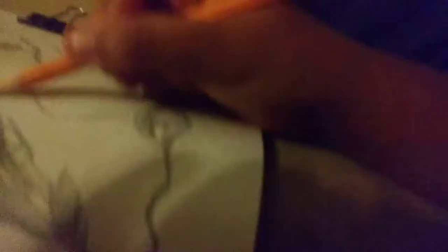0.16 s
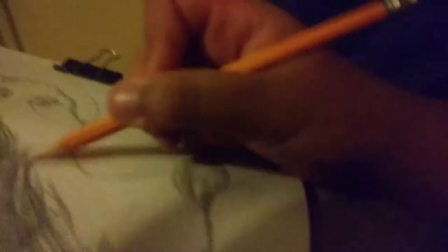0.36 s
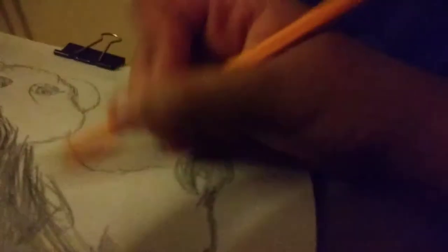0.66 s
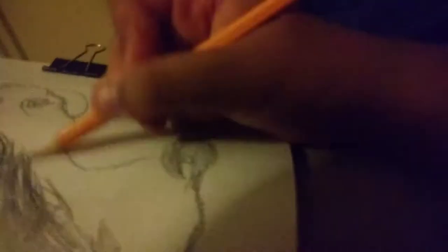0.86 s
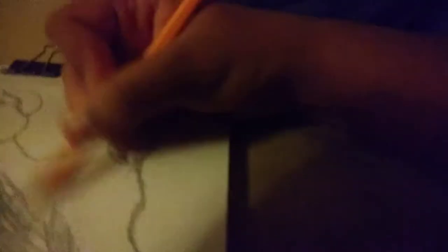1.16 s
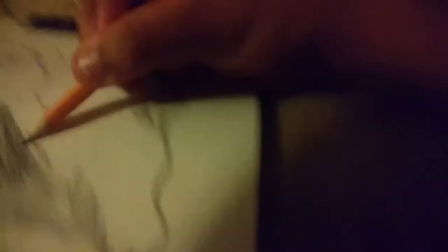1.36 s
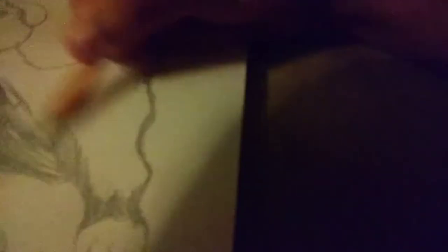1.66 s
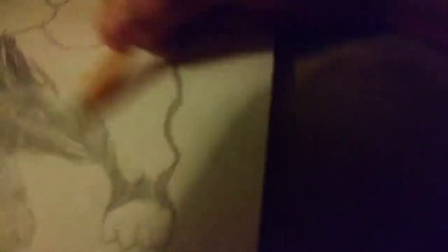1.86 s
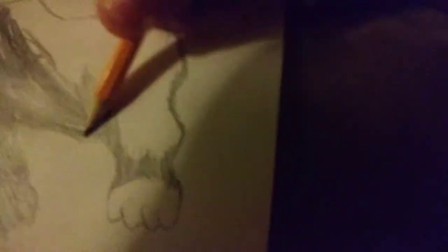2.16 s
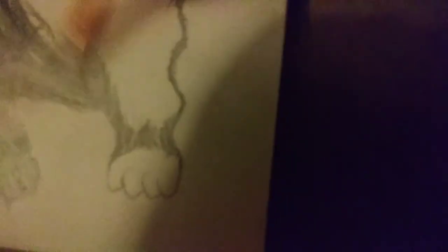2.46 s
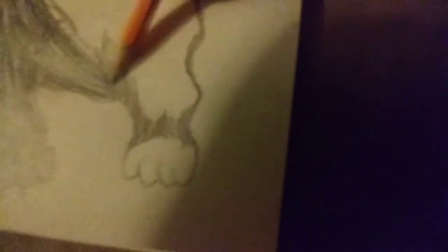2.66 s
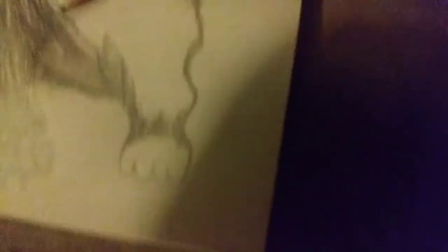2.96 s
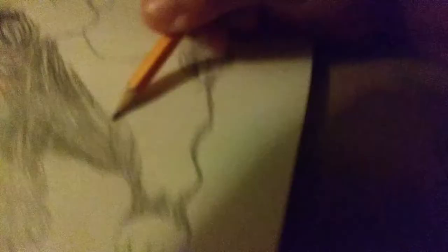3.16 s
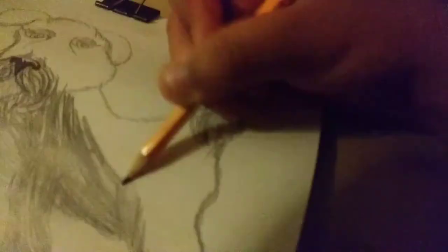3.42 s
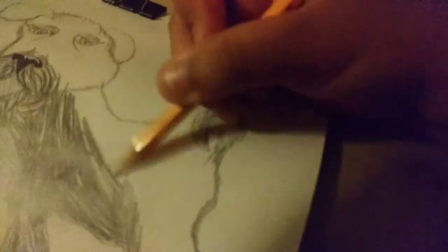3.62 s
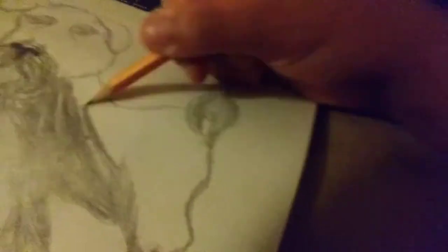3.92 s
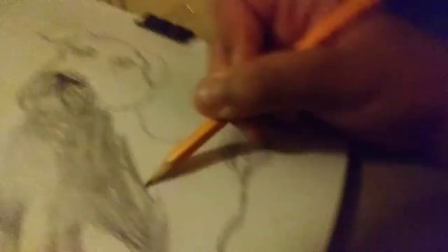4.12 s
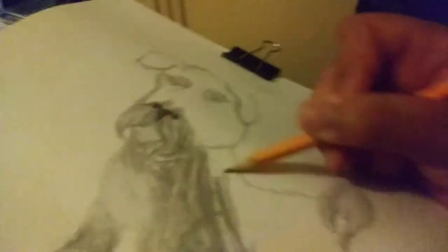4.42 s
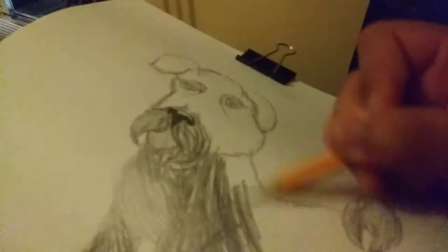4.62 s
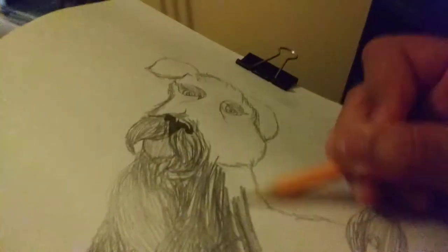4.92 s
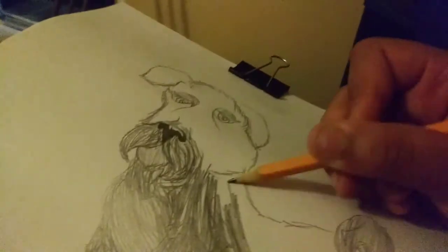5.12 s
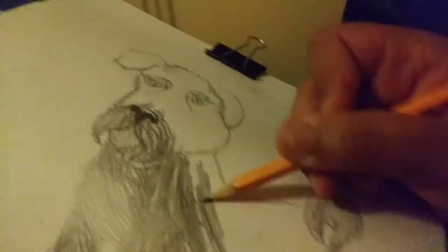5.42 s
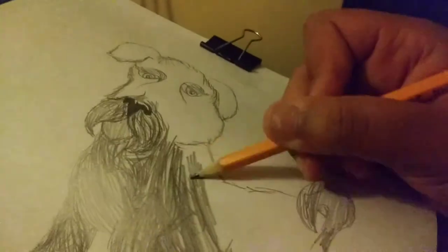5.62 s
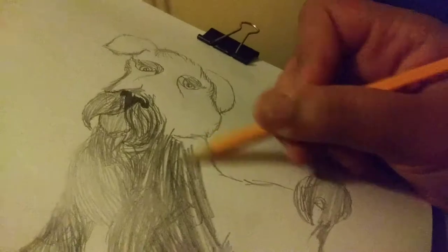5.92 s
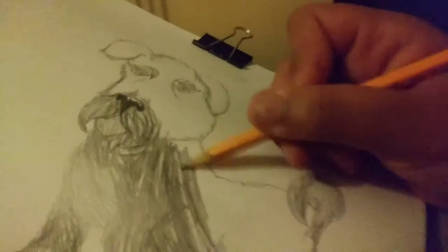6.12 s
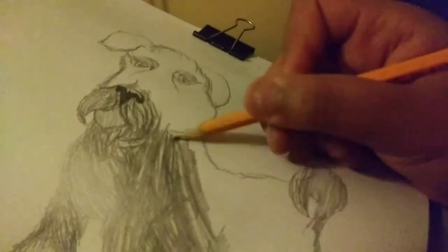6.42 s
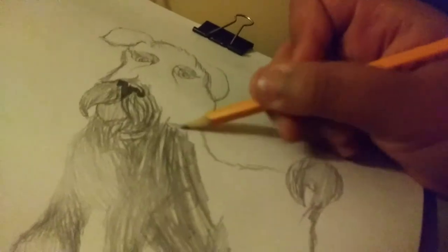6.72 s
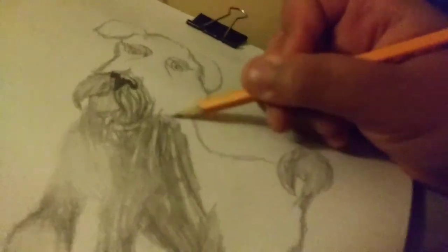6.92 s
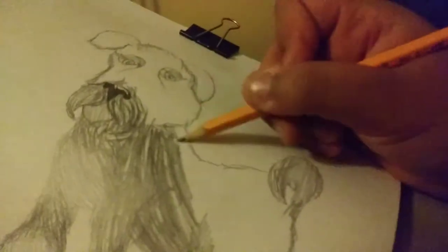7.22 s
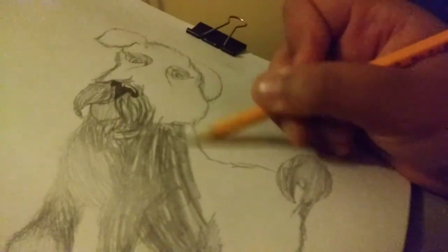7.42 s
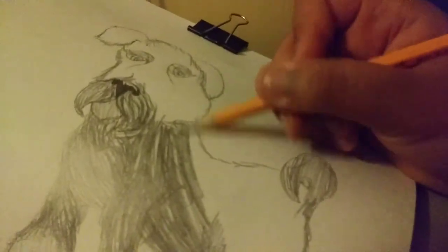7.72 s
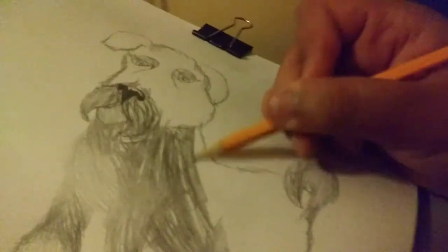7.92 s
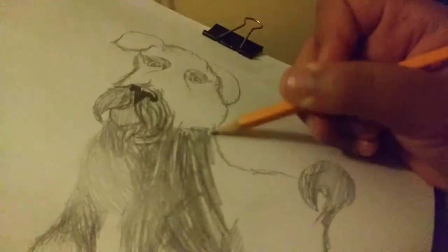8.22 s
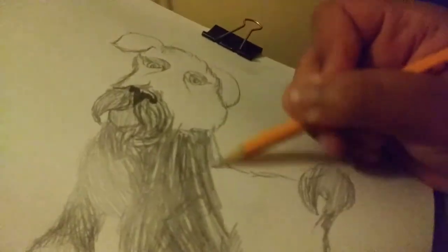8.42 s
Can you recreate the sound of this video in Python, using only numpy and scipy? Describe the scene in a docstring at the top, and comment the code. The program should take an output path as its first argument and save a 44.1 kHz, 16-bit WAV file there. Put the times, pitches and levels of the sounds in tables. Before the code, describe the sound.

A graphite pencil scratches quickly back and forth on paper, close by in a quiet room.

```python
"""A quiet room: a graphite pencil shades quickly back and forth on a paper pad, close to a small
hand-held camera. The paper's tooth rattles the lead and the pad's resonances; short low swells sound
under the strokes and the pad is bumped a few times. The echo off the pad cuts dips in the scratch that
slide as the camera moves. Behind it are room noise and mains hum. The camera's noise suppressor pulls
down every band that sinks to the level of the room noise."""
import sys
import numpy as np
from scipy import signal
from scipy.fft import rfft, irfft, next_fast_len
from scipy.io import wavfile
from scipy.ndimage import uniform_filter1d, map_coordinates

SR = 44100
rng = np.random.default_rng(int(sys.argv[2]) if len(sys.argv) > 2 else 0)


def waveform_to_disk(signal):
    """Save audio, clipped to [-1, 1], as 16-bit WAV at the path in sys.argv[1]."""
    frames = np.transpose(np.atleast_2d(signal))
    scaled = np.clip(frames, -1, 1) * 32767
    samples = np.round(scaled).astype(np.int16)
    wavfile.write(sys.argv[1], SR, samples)


N = 377937

# room noise spectrum: freq_hz, density_db
ROOM_NOISE = [(20, -63), (60, -73), (165, -86), (240, -77), (400, -87), (600, -91), (1000, -88),
              (1850, -87), (3500, -86.5), (7400, -95), (9000, -104), (15400, -108)]


def amp(db):
    """Decibels to gain."""
    return 10 ** (np.asarray(db) / 20)


def unit(x):
    """Scaled to rms 1."""
    return x / np.sqrt(np.mean(x ** 2) + 1e-20)


def step(x):
    """Smooth rise from 0 to 1."""
    return np.sin(np.pi / 2 * np.clip(x, 0, 1)) ** 2


def spectrum_db(points, hz):
    """Levels interpolated on a log frequency axis."""
    freq_hz, level_db = np.transpose(points)
    return np.interp(np.log(hz + 1), np.log(freq_hz + 1), level_db)


def wobble(rate_hz):
    """Smooth random curve, rate_hz knots a second."""
    knots = rng.standard_normal(int(N * rate_hz / SR) + 4)
    return map_coordinates(knots, [np.arange(N) * rate_hz / SR])


def filtered(x, response):
    """x through the gain curve response(hz)."""
    size = next_fast_len(N + 8192)
    return irfft(rfft(x, size) * response(np.fft.rfftfreq(size, 1 / SR)), size)[..., :N]


def room():
    """Steady noise and a slightly unsteady mains hum."""
    # mains harmonics: freq_hz, rms_db
    mains = [(59.6, -57.5), (119.5, -64), (240, -63)]
    t = np.arange(N) / SR
    noise = filtered(rng.standard_normal(N),
                     lambda hz: amp(spectrum_db(ROOM_NOISE, hz)) * np.sqrt(SR / 2))
    hum = sum(amp(db + 2.5 * wobble(9)) * np.sin(2 * np.pi * hz * t + 0.82 * wobble(8))
              for hz, db in mains)
    return noise + np.sqrt(2) * hum


def low_swells():
    """Narrow noise bands that rise and fade; louder ones last longer."""
    # clearest swells: centre_s, pitch_hz, top_db
    clear = [(.026, 624, -55), (.287, 741, -48.5), (.313, 441, -53), (.531, 711, -55), (.748, 718, -53),
             (.755, 462, -54), (.987, 472, -56.5), (1.477, 969, -57.5), (1.493, 420, -53.5),
             (1.814, 484, -57.5), (1.936, 436, -55), (2.064, 926, -56), (2.328, 464, -58.5),
             (2.45, 462, -60), (2.537, 508, -61), (2.683, 446, -56), (3.268, 764, -53.5), (3.518, 885, -54),
             (3.54, 538, -55), (3.573, 301, -65.5), (4.94, 417, -58), (4.985, 614, -55.5),
             (5.776, 789, -60), (6.22, 894, -57), (6.432, 689, -61), (6.73, 1040, -58.5), (6.734, 711, -59),
             (6.89, 444, -58.5), (6.951, 915, -59), (7.155, 861, -60.5), (7.364, 860, -59),
             (7.448, 431, -57.5), (8.023, 408, -56), (8.163, 523, -47), (8.474, 327, -53.5)]
    faint = [(when * N / SR, 420 + 550 * pitch, -64 + 4 * level)
             for when, pitch, level in rng.random((8, 3))]
    out = np.zeros(N + SR)
    for centre_s, pitch_hz, top_db in clear + faint:
        half_s = 0.059 + 0.002 * (top_db + 60)
        t = np.arange(round(2 * half_s * SR)) / SR
        tones_hz = pitch_hz + 50 * rng.standard_normal((12, 1))
        band = unit(np.sin(2 * np.pi * (tones_hz * t + rng.random((12, 1)))).sum(0))
        start = max(round((centre_s - half_s) * SR), 0)
        out[start:][:len(t)] += amp(top_db) * band * np.sin(np.pi * t / t[-1]) ** 2
    return out[:N]


def pad_knocks():
    """Dull bumps on the pad: heavily damped sines."""
    # bumps: start_s, level_db, pitch_hz
    bumps = [(2.335, -30, 70), (2.937, -23, 457), (2.958, -20, 268), (2.984, -34, 220), (3.19, -34, 201)]
    t60_cycles = 3.8
    out, t = np.zeros(N), np.arange(SR // 10) / SR
    for start_s, level_db, pitch_hz in bumps:
        decay = amp(level_db - 60 * t * pitch_hz / t60_cycles)
        out[round(start_s * SR):][:len(t)] += decay * np.sin(2 * np.pi * pitch_hz * t)
    return out


def room_tail(envelope, t60_s):
    """Envelope of the room's tail: power dies away after each stroke."""
    pole = 10 ** (-6 / (t60_s * SR))
    return np.sqrt(np.abs(signal.lfilter([1 - pole], [1, -pole], envelope ** 2)))


def pad_echo(tip):
    """The pad's echo cancels the tip in dips that follow the camera; one band drifts in level."""
    # cancellation dips: centre_hz, width_hz, depth_ratio
    notches = [(1094, 212, 0.78), (1828, 184, 0.93), (3533, 222, 0.61), (7396, 245, 0.79),
               (8730, 750, 0.54), (10180, 410, 0.5), (12330, 680, 0.56), (2476, 170, 0.28),
               (5840, 280, 0.17)]
    # echo as the camera moves: time_s, strength_ratio, freq_ratio
    echo_path = [(0, 0.5, 1.02), (1, 0.24, 0.94), (1.6, 0.62, 0.99), (2, 0.77, 1.09), (2.45, 1, 1.055),
                 (2.55, 0.09, 1.01), (3.5, 0.6, 0.987), (4.5, 0.83, 1.03), (5.1, 0.97, 1.02),
                 (5.4, 0.8, 0.994), (6, 1, 0.99), (7, 1, 1.024), (7.8, 0.81, 1.025), (8.57, 0.76, 1.02)]
    # drifting band: time_s, gain_db
    band_drift = [(0, 2.5), (1.4, 0), (2, -9), (2.45, -6), (2.55, -0.9), (5.3, 1.7), (6.1, 4), (7.3, 4),
                  (7.9, 3.5), (8.57, 2.5)]
    band_hz, band_width_hz = 2466, 210
    hz, t, spectra = signal.stft(tip, SR, nperseg=1024)
    time_s, strength, freq_ratio = np.transpose(echo_path)
    slid_hz = hz[:, None] / np.interp(t, time_s, freq_ratio)
    dips = sum(depth * np.exp(-((slid_hz - centre_hz) / width_hz) ** 2)
               for centre_hz, width_hz, depth in notches)
    echo_gain = 1 - np.interp(t, time_s, strength) * dips
    band_shape = np.exp(-((hz[:, None] - band_hz) / band_width_hz) ** 2)
    band_gain = amp(np.interp(t, *np.transpose(band_drift)) * band_shape)
    return signal.istft(spectra * band_gain * echo_gain, SR, nperseg=1024)[1][:N]


def paper_tooth():
    """Uneven grains rattle the lead; the colour shifts in random patches of time and frequency."""
    patch_rms_db = 2.07
    grains = rng.standard_normal(N) * amp(0.84 * wobble(900) + 0.86 * wobble(150))
    spectra = signal.stft(grains, nperseg=512)[2]
    patches = uniform_filter1d(rng.standard_normal(spectra.shape), size=4, axis=0)
    patches = uniform_filter1d(patches, size=20, axis=1)
    return signal.istft(spectra * amp(patch_rms_db * unit(patches)), nperseg=512)[1][:N]


def hand_motion(t):
    """Each stroke speeds up fast and slows more gently; the tip drags on through the turn."""
    # strokes, forward and back in turn: start_s, length_s, mid_db, swell_db, turn_re_mid_db
    strokes = [(0.0, 0.076, -29, -14.5, -16), (0.1, .11, -31, 5, -43), (.248, 0.072, -25, -3, -21),
               (.348, 0.1, -32.5, 6, -7.5), (.484, .073, -28.5, 4, -8), (0.594, .088, -33.5, -0.5, -7),
               (0.705, .071, -24.5, -2.5, -12.5), (0.809, 0.098, -33.5, 5, -11),
               (.937, 0.076, -24, -6, -13.5), (1.041, .1, -34.5, -1, -19), (1.178, 0.079, -27, -4.5, -15),
               (1.29, 0.099, -35, 0.5, -38), (1.42, 0.096, -32, -10, -16), (1.538, 0.084, -35.5, -5.5, -19),
               (1.665, 0.079, -33, 1, -19), (1.774, .082, -34, -4, -16), (1.897, .088, -33, -2.5, -11.5),
               (2.008, 0.097, -35.5, -2.5, -18), (2.146, 0.093, -36, -8.5, -17),
               (2.272, 0.061, -35, -0.5, -14.5), (2.386, 0.092, -41, -8, -16),
               (2.505, 0.087, -33, -2.5, -17.5), (2.63, 0.075, -35, -1, -10),
               (2.736, 0.099, -36, -1.5, -14), (2.865, 0.088, -33.5, -5.5, -6),
               (2.982, 0.1, -31.5, -2, -15), (3.123, 0.082, -30.5, 0, -11.5),
               (3.246, 0.091, -29.5, -6.5, -22), (3.365, 0.087, -28.5, -6, -30),
               (3.472, 0.098, -31.5, -2, -8.5), (3.596, 0.077, -29.5, -0.5, -12),
               (3.699, 0.082, -33.5, -4, -5), (3.809, 0.08, -31, -1, -16), (3.916, .1, -33, 3, -16),
               (4.047, 0.085, -30.5, -4.5, -16), (4.156, 0.098, -30, 2.5, -23),
               (4.288, 0.079, -30.5, -2.5, -16), (4.396, 0.098, -32.5, 0.5, -27),
               (4.523, 0.076, -33, -5.5, -14), (4.625, 0.093, -36, -2, -12),
               (4.755, 0.077, -37.5, -10, -13), (4.85, 0.082, -36.5, 11, -19), (4.966, 0.06, -34, -4, -15),
               (5.054, 0.088, -36, 10.5, -16), (5.183, 0.076, -32.5, -12, -19),
               (5.287, 0.094, -36, -2, -9.5), (5.42, 0.065, -32.5, 4, -7.5),
               (5.519, 0.076, -34.5, 6.5, -10.5), (5.635, 0.061, -36, -8, -0.5),
               (5.733, 0.084, -37.5, 5, -9), (5.86, 0.059, -35.5, -3, -10), (5.973, 0.083, -41, -6, -4.5),
               (6.083, 0.073, -41, 4, -10), (6.207, 0.05, -37.5, 1, -8), (6.303, 0.092, -41.5, 9, -10),
               (6.419, .1, -42, -10, -3.5), (6.555, 0.067, -43, 14, -5.5), (6.668, 0.064, -41, 0, -7),
               (6.789, .088, -41.5, 8, -1.5), (6.913, 0.064, -38.5, -19, -3), (6.985, 0.095, -40.5, 3, 0),
               (7.117, 0.086, -41.5, -11, -2.5), (7.215, 0.084, -38, 18, -5.5),
               (7.357, 0.072, -38.5, -15, -7), (7.457, 0.07, -36, 3, -15), (7.545, 0.074, -37.5, 1, -8),
               (7.644, 0.071, -36, 4, -6), (7.753, .08, -37, 10, -6.5), (7.87, 0.072, -31, 4, -11),
               (7.988, 0.082, -35, 5, -9), (8.12, 0.074, -32, 6, -9), (8.226, 0.083, -34, 5, -13),
               (8.341, 0.085, -33, 4, -10), (8.455, 0.084, -34, 9, -11.5)]
    rise_s, fall_s, ends_db = 0.021, 0.035, -4.5
    sliding, off_centre = np.zeros(N), np.ones(N)
    for start_s, length_s, mid_db, swell_db, _ in strokes:
        span = slice(max(round((start_s - 0.03) * SR), 0), round((start_s + length_s + 0.06) * SR))
        age_s = t[span] - start_s
        speed = step(age_s / rise_s + 0.5) * step((length_s - age_s) / fall_s + 0.42)
        ends = (2 * age_s / length_s - 1) ** 2  # 0 in mid-stroke, 1 at either end
        sliding[span] += amp(mid_db + swell_db * (age_s / length_s - 0.5) + ends_db * ends) * speed
        off_centre[span] = np.where(speed > 0, np.minimum(ends, 1), off_centre[span])
    start_s, length_s, mid_db, _, turn_db = np.transpose(strokes)
    drag = amp(np.interp(t, start_s + length_s + 0.0059, mid_db + turn_db))
    backward = np.interp(t, start_s + length_s / 2, np.arange(len(strokes)) % 2)
    return sliding, drag, off_centre, backward


def pencil():
    """Lead scraping on paper, in six bands: pad, sheet, scratch, edge, hiss, air."""
    # lead on paper, shape within the bands: freq_hz, relative_db
    lead_spectrum = [(200, -9), (450, -22), (800, -20.5), (1000, -14.5), (1250, -3.5), (1550, -2),
                     (1850, -11), (2150, -11.5), (2950, -6), (3550, -8.5), (4100, -4.5), (5200, -0.9),
                     (6600, -10.5), (7500, -11.5), (8200, -16), (8900, -18.5), (10000, -21), (12500, -33),
                     (15400, -46.5)]
    # borders between the bands: freq_hz
    borders_hz = [1850, 3550, 5900, 7400, 8550]
    # balance re scratch as the camera moves: time_s, pad_db, sheet_db, edge_db, hiss_db, air_db
    balance = [(0, -8.5, -10, -1.5, -10, -14), (.7, -13, -7, -3.5, -15, -15.5),
               (1.0, -7, -6, -6, -15, -16.5), (1.4, -6.5, -3, -4.5, -11.5, -12.5),
               (2, -9, -3, -9.5, -10, -18.5), (2.43, -6, -2.5, -5, -12, -16.5),
               (2.55, -5.5, -2.5, -6, -13, -16), (2.9, -5, -1, -4, -15.5, -14),
               (3.3, -9.5, -4.5, -8, -19, -18.5), (4, -9.5, -7.5, -6.5, -19.5, -17),
               (4.7, -11, -9, -13, -18, -18), (5.1, -9, -5, -14.5, -15.5, -18),
               (5.5, -14, -6.5, -9.5, -13.5, -20.5), (6, -10, -8.5, -7, -11.5, -25.5),
               (6.8, -10.5, -9, -10, -19.5, -24.5), (7.3, -13.5, -9.5, -8, -14.5, -19.5),
               (7.9, -8, -6.5, -8, -13.5, -19.5), (8.57, -12, -8, -12, -17, -21)]
    # offsets on back strokes: pad_db, sheet_db, edge_db, hiss_db, air_db
    back_offsets = [-1.2, -0.71, 0.99, 1.7, 0.75]
    # room tail and dull slow drag, a row per band: tail_db, drag_db
    tail_and_drag = [(-7.5, -1), (-38, 0), (-45, -4), (-27, -18), (-27, -27), (-36, -16)]

    def band_gains(hz):
        above = [np.ones_like(hz)] + [step((hz - border) / 300 + 0.5) for border in borders_hz]
        split = -np.diff(above, axis=0, append=0)
        return split * amp(spectrum_db(lead_spectrum, hz)) * step(hz / 350 - 0.2)

    t = np.arange(N) / SR
    bands = filtered(paper_tooth(), band_gains)
    sliding, drag, off_centre, backward = hand_motion(t)
    time_s, *columns = np.transpose(balance)
    pad_db, sheet_db, edge_db, hiss_db, air_db = (
        np.interp(t, time_s, column) + back_db * backward
        for column, back_db in zip(columns, back_offsets))
    air_db -= 2.5 * uniform_filter1d(off_centre, size=400)  # needs speed: peaks in mid-stroke
    levels_db = [pad_db, sheet_db, 0, edge_db, hiss_db, air_db]
    tail = room_tail(sliding, t60_s=0.15)
    tip = np.zeros(N)
    for band, level_db, (tail_db, drag_db) in zip(bands, levels_db, tail_and_drag):
        envelope = np.sqrt(sliding ** 2 + (amp(drag_db) * drag) ** 2 + (amp(tail_db) * tail) ** 2)
        tip += amp(level_db) * envelope * unit(band)
    return pad_echo(tip)


def scene():
    """Pencil and pad over the room noise, mono."""
    return (pencil() + low_swells() + pad_knocks() + room())[None]


def noise_suppressor(x, margin_db, floor_db):
    """Turns down bands whose smoothed power is near the room noise; triple margin in the bass."""
    frame, overlap = 1024, 768
    hz, _, spectra = signal.stft(x, SR, nperseg=frame, noverlap=overlap)
    power = uniform_filter1d(np.abs(spectra) ** 2, size=3, axis=-2)
    power = np.abs(uniform_filter1d(power, size=13, axis=-1))
    threshold_db = spectrum_db(ROOM_NOISE, hz) + margin_db * np.where(hz < 350, 3, 1)
    threshold = amp(threshold_db)[:, None] ** 2 * SR * 3 / 4 / frame  # density to power per bin
    gain = np.clip(1 - (threshold / (power + 1e-20)) ** 3.73, amp(floor_db), 1)
    gain = uniform_filter1d(gain, size=3, axis=-1)
    return signal.istft(spectra * gain, SR, nperseg=frame, noverlap=overlap)[1][..., :N]


def record(dry):
    """Camera: noise suppressor, then bass cut and band limit."""
    bass_cut_hz, top_hz = 52, 15450
    suppressed = noise_suppressor(dry, margin_db=4, floor_db=-16)
    return filtered(suppressed, lambda hz: (hz < top_hz) / (1 + (bass_cut_hz / (hz + 1)) ** 4))


dry = scene()
out = record(dry)
waveform_to_disk(out)
```